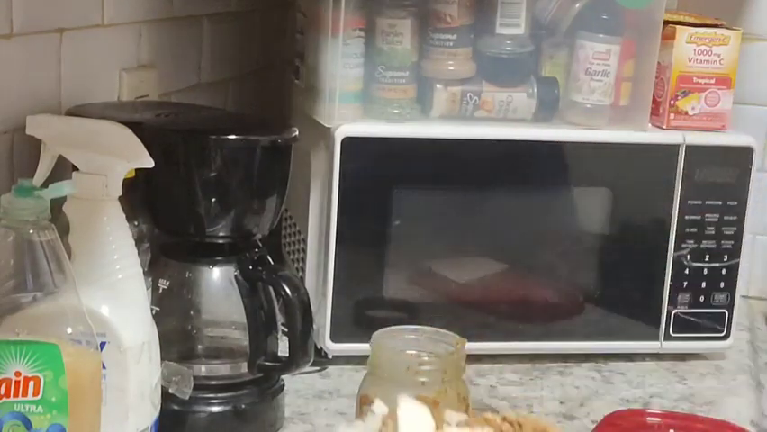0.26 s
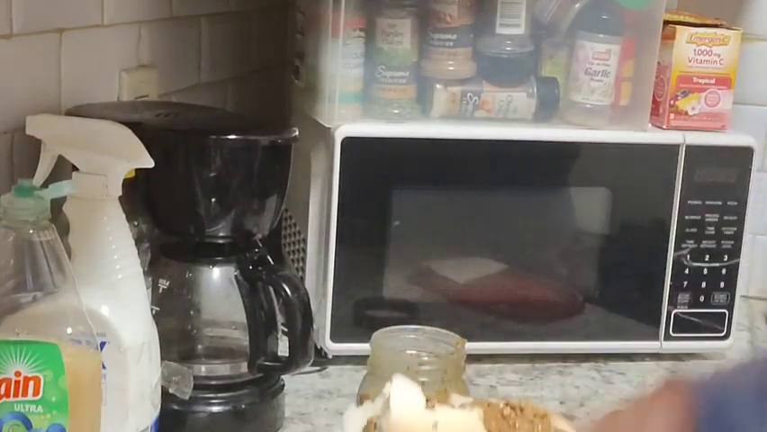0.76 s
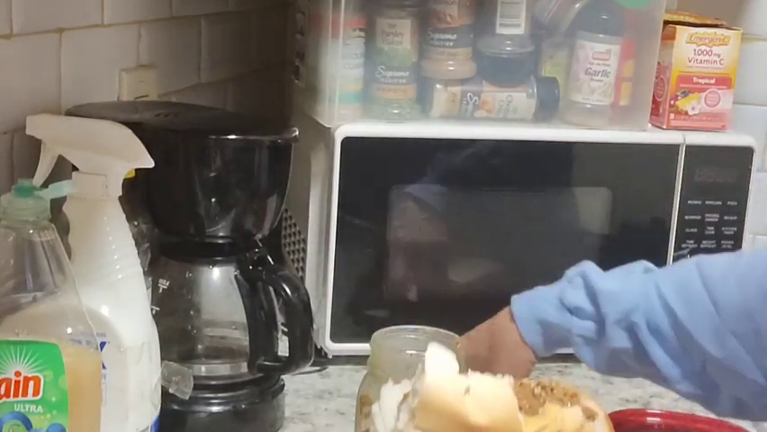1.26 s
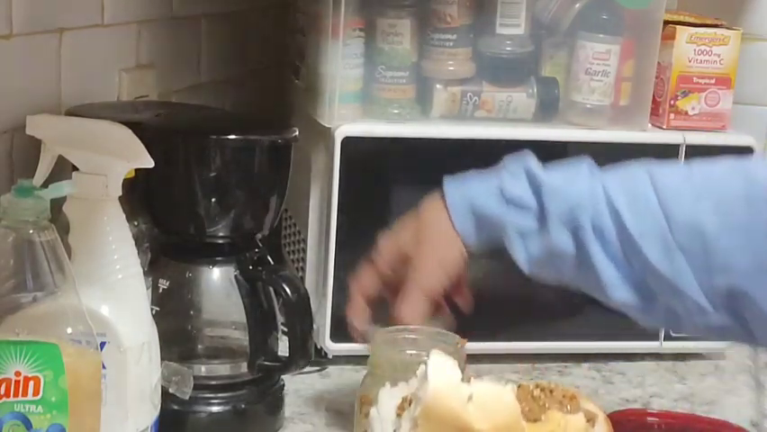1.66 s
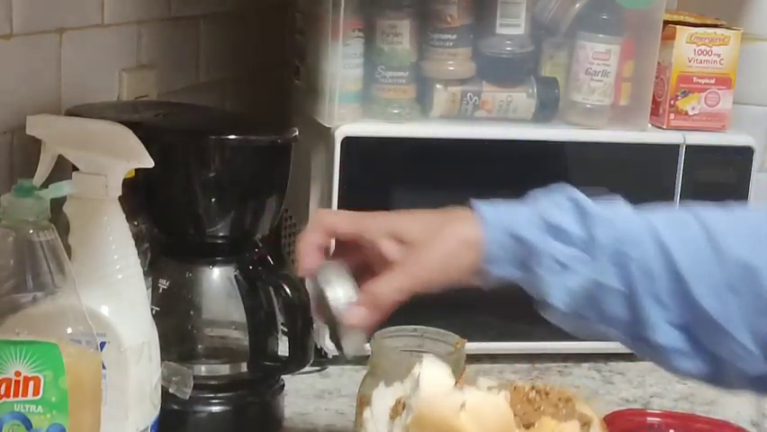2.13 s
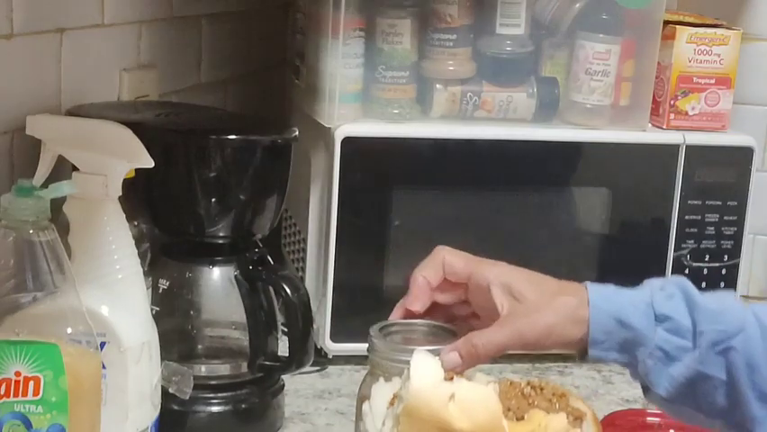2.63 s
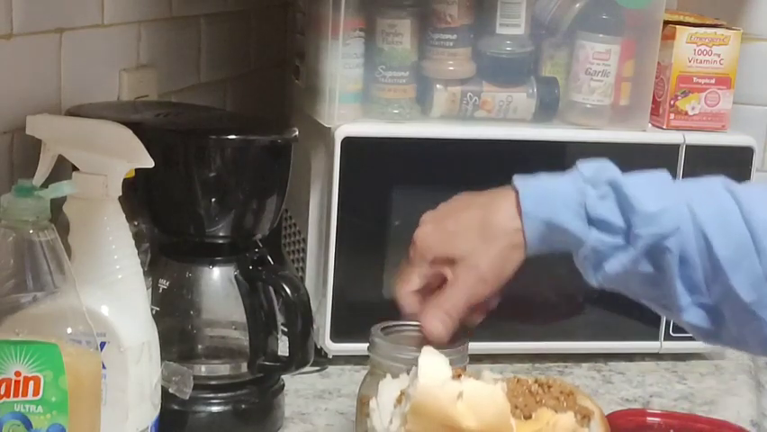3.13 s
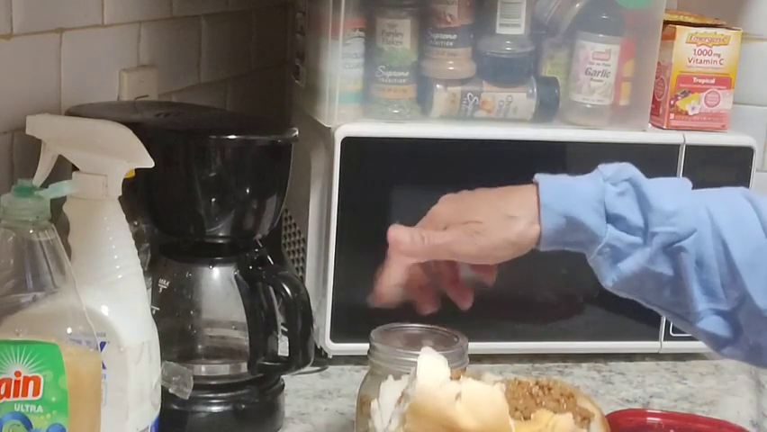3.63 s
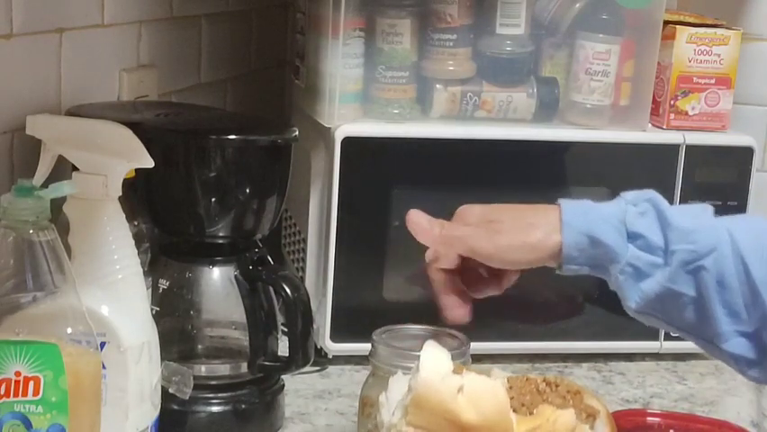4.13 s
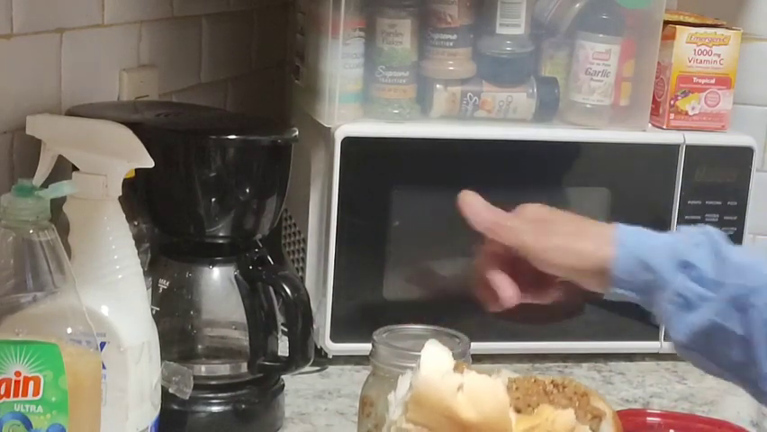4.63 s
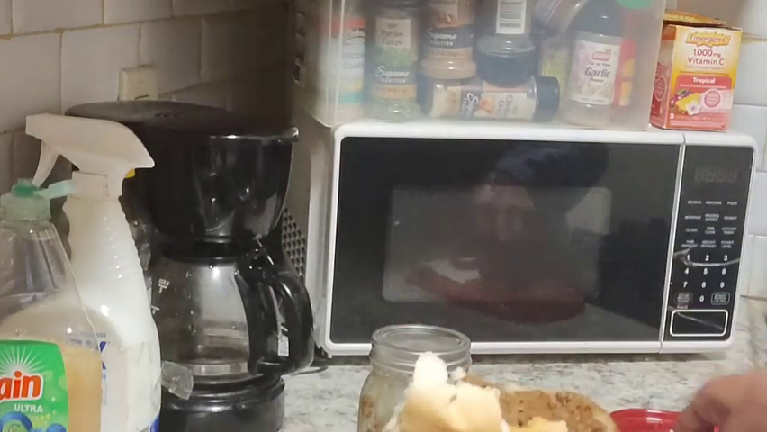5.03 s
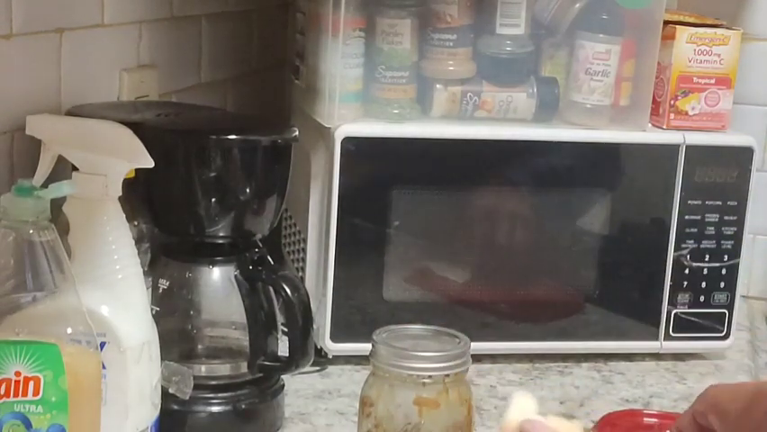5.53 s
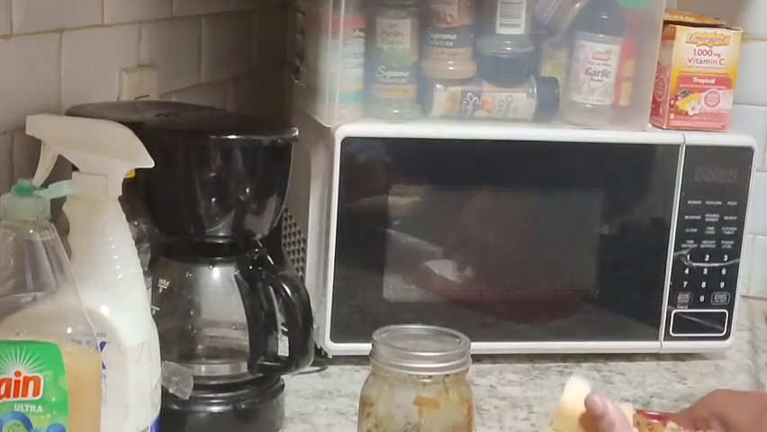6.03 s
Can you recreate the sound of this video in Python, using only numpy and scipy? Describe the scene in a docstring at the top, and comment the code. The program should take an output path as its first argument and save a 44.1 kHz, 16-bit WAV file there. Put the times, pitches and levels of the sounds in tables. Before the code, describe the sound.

A metal utensil clatters sharply on a stone counter, then a metal lid clinks onto a glass jar and is tapped with dull thuds.

```python
"""A metal spoon or lid clatters and bounces on a stone counter in a quiet kitchen: dying sines over noise.
A metal lid, made the same way, is set on a glass jar, pressed home and tapped with a finger.
The jar's air and the counter answer with low knocks; fingers, a sleeve and a plate rub as grainy noise.
Small dry ticks come about three a second, strongest on the left, over room noise and a refrigerator's hum.
Left and right hear the nearby sounds in different colours."""
import sys
import numpy as np
from scipy import signal
from scipy.fft import rfft, irfft
from scipy.io import wavfile
from scipy.ndimage import uniform_filter1d

SR = 44100
rng = np.random.default_rng(int(sys.argv[2]) if len(sys.argv) > 2 else 0)


def file_out(sig):
    """Save sig as 16-bit WAV at sys.argv[1]."""
    # one column per channel
    cols = np.atleast_2d(sig).T
    # limit, then scale
    lim = np.clip(cols, -1, 1)
    pcm = np.round(lim * 32767).astype(np.int16)
    wavfile.write(sys.argv[1], SR, pcm)


N = 277116


def gain_of(db):
    """Turns decibels into a factor to multiply by."""
    return 10 ** (np.asarray(db) / 20)


def read(points, hz):
    """Reads a table of (pitch, value) in straight lines along a logarithmic pitch axis."""
    pitch_hz, value = np.transpose(points)
    return np.interp(np.log(hz + 1), np.log(pitch_hz + 1), value)


def add(mix, start_s, sound):
    """Mixes in a two-channel sound from start_s on, cut off at the end of the mix."""
    part = mix[:, round(start_s * SR):][:, :sound.shape[1]]
    part += sound[:, :part.shape[1]]


def sides(left_right_db):
    """Left and right gains that differ by the given decibels; above zero favours the left."""
    return gain_of(np.array([left_right_db / 2, -left_right_db / 2]))


def onset(t, rise_ms):
    """A smooth rise from 0 to 1, never faster than 0.3 ms."""
    return np.sin(np.pi / 2 * np.clip(1000 * t / max(rise_ms, .3), 0, 1)) ** 2


# How unlike left and right hear nearby sounds: (pitch_hz, left_right_db)
NEAR_SIDES = [(60, -4.5), (110, 4), (200, 2), (380, -8), (700, 1), (1290, 7), (2380, 5), (4400, 13),
              (8120, -6.5), (15000, -5.5)]


def noise(size, spectrum, tilt_db=0., same=0.072, side=NEAR_SIDES, lumpy_db=0.):
    """Two partly alike channels of coloured noise, rms 1; random lumps stand for clusters of resonances."""
    hz = np.fft.rfftfreq(size, 1 / SR)
    left, other = rfft(rng.standard_normal((2, size)))
    unlike = np.sqrt(1 - np.minimum(abs(same), 1) ** 2)
    right = same * left + unlike * other
    lump_heights = np.minimum(rng.exponential(1, 400), 2.8)
    lumps = np.interp(hz, np.arange(400) * 110, lump_heights)  # one every 110 Hz
    tilt = tilt_db * np.log2((hz + 50) / 5000)  # dB an octave
    colour = gain_of(read(spectrum, hz) + tilt + lumpy_db * lumps) * sides(read(side, hz))
    x = irfft(np.array([left, right]) * colour, size)
    return x / np.sqrt(np.mean(x ** 2))


def ring(modes, t, place=.5, damping=1., waver=.6, lead=0.88):
    """Dying sines weighted by the place struck; reflections and rebounds make each waver on each side."""
    hz, one_end_db, other_end_db, fade_s = np.transpose(modes)
    level = gain_of(one_end_db + np.clip(place, 0, 1) * (other_end_db - one_end_db))
    level = level / np.linalg.norm(level) * sides(read(NEAR_SIDES, hz))
    # random values 7 ms apart, joined by straight lines
    knots = rng.standard_normal((2, 2, len(hz), 64))
    step = t / .007
    whole, part = step.astype(int) % 63, step % 1
    drift = knots[..., whole] * (1 - part) + knots[..., whole + 1] * part
    phase = 2 * np.pi * (hz[:, None] * t + rng.random((len(hz), 1)))
    phase = phase + np.array([lead, 0])[:, None, None]  # left leads, in radians
    wave = (1 + waver * drift[0]) * np.sin(phase) + waver * drift[1] * np.cos(phase)
    decay = gain_of(-60 * damping * t / np.clip(fade_s, .02, .6)[:, None])
    return np.einsum("cm,cmt->ct", level, decay * wave) / np.hypot(1, waver)


TAP_RISE_MS, SLIDE_RISE_MS, GLASS_RISE_MS = 2.8, 27.5, 17.5
RING_PER_DB = 0.4661  # harder blows ring more clearly: dB of ring over clatter for each dB of strength
LUMPY_DB = 5  # how uneven the clatter is from one cluster of resonances to the next
ECHO_DB, ECHO_FADE_S = -41.5, 1  # kitchen echo: dB against the blow before its soft rise, s to fall 60 dB


def blows(rows, rise_ms, modes, clatter, ring_db, crack_db, fade_s, chatter_db, waver):
    """A crack, clear sines and dense clatter roughened by tiny rebounds; it holds, then dies away quickly."""
    out, t, echo_t = np.zeros((2, N)), np.arange(14000) / SR, np.arange(27000) / SR
    for time_s, level_db, left_right_db, tail_s, tilt_db, place in rows:
        tail_s = max(tail_s, .02)
        clear_db = ring_db + RING_PER_DB * level_db

        rebounds = np.minimum(rng.exponential(1, 200), 3.5) - 1
        chatter = np.interp(t, np.arange(200) * 0.0017, rebounds)
        tail = gain_of(-60 * t / tail_s)
        crack = gain_of(crack_db - 60 * t / 0.011)
        dense = noise(len(t), clatter, tilt_db, lumpy_db=LUMPY_DB)
        dense = dense * gain_of(chatter_db * chatter) * (tail + crack)

        clear = gain_of(clear_db) * ring(modes, t, place, 0.28 / tail_s, waver)
        envelope = onset(t, rise_ms) * np.exp(-(t / fade_s) ** 4)
        level = gain_of(level_db) / np.hypot(1, gain_of(clear_db)) * sides(left_right_db)[:, None]
        add(out, time_s - .001, level * (dense + clear) * envelope)

        # the echo off tiles and cupboards swells in and is eased out at its end
        echo = noise(len(echo_t), clatter, tilt_db) * gain_of(ECHO_DB - 60 * echo_t / ECHO_FADE_S)
        echo = echo * onset(echo_t, 40) * onset(echo_t[::-1], 100)
        add(out, time_s, gain_of(level_db) * echo)
    return out


# Colour of the room noise: (pitch_hz, relative_level_db per Hz)
ROOM_COLOUR = [(18, -53), (43, -15.5), (140, -5.5), (183, -10), (247, -5.5), (366, -8), (542, -9),
               (1100, -18), (1250, -20), (2400, -27.5), (3900, -29), (4500, -25.5), (5200, -29),
               (5950, -23), (6900, -34), (8500, -35), (9000, -28), (9600, -35), (15750, -38.5),
               (16000, -53.5)]
# How alike left and right are, limited to 0-1 in use: (pitch_hz, likeness)
ROOM_LIKENESS = [(60, 1), (180, 1.5), (550, 0.18), (1650, -2), (4970, -3), (15000, 2)]
# Balance of the room noise: (pitch_hz, left_right_db)
ROOM_SIDES = [(60, 1.5), (180, 5), (550, 2), (1650, 5), (4970, -1), (15000, -3.5)]
# How far left runs ahead in the shared part of the noise: (pitch_hz, lead_radians)
ROOM_LEADS = [(50, 0.043), (300, 0.3), (1000, 1.2), (3000, 3.5), (9000, 6.2)]
# Refrigerator hum bands, 30 dB down one width either side: (pitch_hz, width_hz, level_db)
HUM_BANDS = [(141.7, 6.8, -70), (294, 14, -72.5), (557, 40, -75.5), (836.8, 360, -74)]
ROOM_DB = -63.5


def room():
    """Steady coloured noise, gently swelling, with narrow noise bands for the refrigerator's wavering hum."""
    hz = np.fft.rfftfreq(N, 1 / SR)
    swell = uniform_filter1d(rng.standard_normal(N), 5000) * np.sqrt(5000)
    likeness = np.clip(read(ROOM_LIKENESS, hz), 0, 1) * np.exp(-1j * read(ROOM_LEADS, hz))
    air = noise(N, ROOM_COLOUR, same=likeness, side=ROOM_SIDES)
    tone = gain_of(ROOM_DB + 0.27 * swell) * air
    for pitch_hz, width_hz, level_db in HUM_BANDS:
        band = [(pitch_hz - width_hz, -30), (pitch_hz, 0), (pitch_hz + width_hz, -30)]
        spectrum = [(0.98, -69)] + band + [(2000, -95.5)]
        tone = tone + gain_of(level_db) * noise(N, spectrum, same=1.0, side=ROOM_SIDES)
    return tone


# When each tick comes and how strong it is: (time_s, level_db)
TICK_TIMES = [(.2258, -48), (.5436, -47.5), (1.1782, -42.5), (1.501, -44), (1.8188, -45.5), (2.141, -46.5),
              (2.8695, -46), (2.9407, -45.5), (3.0985, -45), (3.4188, -43.5), (3.7426, -43.5),
              (4.0563, -52), (4.386, -43), (4.7073, -45), (5.024, -47.5), (5.3433, -47), (5.6675, -44.5),
              (5.9941, -46.5)]
# The short sines inside one tick: (pitch_hz, level_db, fade_s to fall 60 dB, delay_ms)
TICK_SINES = [(15800, -1, 0.0012, .4), (14200, 1.5, 0.0013, 0.416), (12320, 0, 0.0012, .35),
              (10960, -7.5, 0.0015, 0.267), (9820, -7.5, 0.0021, .3), (7900, -6, 0.0022, 0.11),
              (6440, -10, 0.0052, 0), (4850, -12.5, 0.0052, 0.926), (3940, -5.5, 0.0095, 1.09)]
TICK_SIDE_DB = 19  # left over right


def ticks():
    """Each dry tick sums short sines with tiny delays of their own; a faint low-pitched one comes just before."""
    out, t = np.zeros((2, N)), np.arange(2048) / SR
    parts = []
    for pitch_hz, level_db, fade_s, delay_ms in TICK_SINES:
        since_s = np.maximum(t - delay_ms / 1000, 0)
        sine = np.sin(2 * np.pi * pitch_hz * since_s)
        parts.append(gain_of(level_db - 60 * since_s / fade_s) * sine * onset(since_s, .25))
    for time_s, level_db in TICK_TIMES:
        level = gain_of(level_db) * sides(TICK_SIDE_DB)[:, None]
        add(out, time_s - .0008, level * sum(parts))
        add(out, time_s - .0185, gain_of(-15) * level * parts[-1])
    return out


# Blows of the spoon or lid on stone, begun 1 ms before time_s:
# (time_s, level_db, left_right_db, tail_s to fall 60 dB, tilt_db per octave, place struck 0-1)
CUTLERY_BLOWS = [(.4117, -38.5, -1.5, 0.32, -1.5, 0.2), (.4274, -45, -11, 0.23, 6, .9),
                 (.4444, -48, -1, 0.39, -1, 0.8), (.6835, -11.5, 5, 0.31, 1.13, 0),
                 (.816, -12, -3, .26, 1, 0.93), (.8353, -13.5, -1.5, 0.17, -2, 1),
                 (.9045, -12.5, -3.5, 0.19, -1.16, 0.99), (.946, -17.5, -2.5, 0.19, -1.6, 0.8),
                 (.9935, -28.5, 0.5, 0.16, -4, 1)]
# Its slide along the stone: same columns
CUTLERY_SLIDE = [(.592, -51.5, -3, .48, -.35, .3)]
# Clear tones of the metal; each blow's tail also scales the fade:
# (pitch_hz, level_db struck at one end, level_db struck at the other, fade_s)
STEEL_TONES = [(1330, -25, -20, .4), (1895, -18, -8, .13), (2750, -10, -14, .12), (3198, -13, -18, .23),
               (3442, -2, -8, .2), (3485, -9, -14, .2), (5137, -4, -6, .15), (5503, -14, -14, .3),
               (5780, -5, -16, .17), (5826, 0, -14, .18), (5889, -5, -16, .17), (6288, -6, -14, .25),
               (6890, -20, -12, .12), (7052, -4, -16, .27), (8326, -20, 0, .22), (9088, -18, -5, .2),
               (9823, -5, -6, .3), (10910, -22, -18, .22), (11785, -25, -6, .2), (12520, -13, -16, .25),
               (13485, -18, -16, .24), (13920, -20, -12, .25)]
# Colour of its dense clatter: (pitch_hz, relative_level_db per Hz)
STEEL_COLOUR = [(240, -32.5), (430, -14), (650, -6.5), (900, -14), (1500, -18), (1880, -2), (2370, -9),
                (3370, -5.5), (6710, -7.5), (8580, -4.5), (11100, -10.5), (12000, -4), (15600, -7.5),
                (16100, -35)]


def cutlery():
    """Metal bouncing and sliding on stone: quick-rising blows and a slower-rising slide."""
    steel = dict(modes=STEEL_TONES, clatter=STEEL_COLOUR, ring_db=9.5, crack_db=2,
                 fade_s=0.23, chatter_db=2.0, waver=0.93)
    return blows(CUTLERY_BLOWS, TAP_RISE_MS, **steel) + blows(CUTLERY_SLIDE, SLIDE_RISE_MS, **steel)


# Low knocks, begun 4 ms before time_s: (time_s, jar_air_level_db, left_right_db, boom_over_jar_db)
LOW_KNOCKS = [(.414, -39.5, 2.5, 0), (.437, -53.5, 17, 4.5), (.688, -38.5, 6, 8), (.814, -38, -6.5, 10),
              (.908, -36.5, -15, 0), (.957, -41, -5, 4), (2.297, -49, -25.5, 1.5),
              (2.415, -47.5, -19, -1.5), (2.482, -34, -8, -4), (3.121, -48, -15.5, -9),
              (3.264, -59.5, -30, -1.5), (3.504, -35.5, -20.5, -3), (3.53, -42, -10, -9),
              (3.562, -41, -6, -7.5), (3.595, -39, -14, -10.5), (3.815, -38.5, -17, -4),
              (3.857, -27.5, -14, -6), (4.066, -35, -27, -6), (4.125, -11, -12.5, -13),
              (4.148, -26.5, -10, 0.2), (4.337, -42.5, -19, 1.8), (4.386, -26, -22, -3.5),
              (4.569, -46, -12, 4), (4.603, -37, -9, -1.5)]
# Low tones of the counter, fade limited to 0.6 s in use:
# (pitch_hz, level_db struck at one end, level_db struck at the other, fade_s)
COUNTER_TONES = [(120, -8, -9, 0.19), (149.4, 2, -4, 0.6), (209.2, -6.5, -3, 0.9), (242.9, 5, 0, 0.31),
                 (317.9, -3, -2, 0.6), (426, -4, -4, 0.13)]
# Colour of the counter's boom: (pitch_hz, relative_level_db per Hz)
BOOM_COLOUR = [(29, -51), (50, -21), (92, -20.5), (135, -7.5), (233, -8), (270, -2.5), (383, -7),
               (523, -18.5), (628, -19), (1100, -25.5), (1600, -32.5), (4000, -56), (5200, -83),
               (8800, -120)]
JAR_AIR_HZ = 385.8  # where the swing settles
KNOCK_RISE_MS, KNOCK_RISE_MS_PER_DB = 19, 0.26  # a firm press builds up longer than a light one
KNOCK_FADE_S = 0.044  # main burst down 60 dB


def knocks():
    """A soft blow swings the air in the jar for a few cycles; the counter's boom lasts longer."""
    out, t = np.zeros((2, N)), np.arange(9000) / SR
    for time_s, level_db, left_right_db, boom_db in LOW_KNOCKS:
        sag = 1 + 0.074 * np.exp(-t / 0.0068)  # the pitch sags as the lid relaxes
        swing = np.sin(2 * np.pi * JAR_AIR_HZ * np.cumsum(sag) / SR)
        burst = gain_of(-60 * (t / KNOCK_FADE_S) ** 2) + gain_of(-23 - 60 * t / 0.33)
        rise = onset(t, KNOCK_RISE_MS + KNOCK_RISE_MS_PER_DB * level_db)
        air = swing * burst * rise * sides(left_right_db)[:, None]

        rumble = noise(len(t), BOOM_COLOUR, same=0.41, lumpy_db=4.5) * gain_of(-60 * t / 0.28)
        boom = ring(COUNTER_TONES, t, waver=0.35, lead=0.56) + gain_of(-1.0) * rumble
        boom = gain_of(boom_db) * boom * onset(t, 12) * np.exp(-(t / 0.13) ** 6)
        boom = boom * sides(0.47 * left_right_db)[:, None]
        add(out, time_s - .004, gain_of(level_db) * (air + boom))
    return out


# Blows of the jar's lid, begun 1 ms before time_s:
# (time_s, level_db, left_right_db, tail_s to fall 60 dB, tilt_db per octave, place struck 0-1)
LID_BLOWS = [(1.4656, -55, 2, .3, -2.5, .5), (2.2827, -38, 4, 0.22, 1, 0.35),
             (2.294, -46.5, -1, 0.22, -1, .2), (2.404, -43.5, 0, 0.33, -1, 0.84),
             (2.4113, -37, 3.5, 0.41, 0.5, 1), (2.4747, -39, 8, 0.2, -5, 0.47),
             (2.508, -45.5, .1, 0.42, -6, 0.35), (3.178, -47.5, .4, .26, -4, 0.85),
             (3.4996, -31, -3, 0.79, 4, 0.42), (3.81, -57, -2.5, 0.75, -3, .18),
             (4.0548, -42.5, -0.5, .4, -3.5, 0.0106), (4.1244, -44, -2, 0.35, -4, 0.094),
             (4.582, -60.5, -1, .2, -3, .05), (5.108, -59.5, 5, .12, -9, 0.21)]
# Slides of the lid: same columns
LID_SCRAPES = [(1.43, -54, 0, .35, -2.5, .5), (3.125, -50, -1, 0.73, 1.5, .3),
               (3.21, -44, -1, .24, -1, .22), (3.528, -43, 1.5, 0.59, -5.5, 0.25),
               (3.825, -41, -3, 0.26, 0.5, 0.18), (4.077, -37.5, 5, 0.28, 8, 0.17)]
# Clear tones of the lid; each blow's tail also scales the fade:
# (pitch_hz, level_db struck at one end, level_db struck at the other, fade_s)
TIN_TONES = [(2486, 0.5, -27.5, 0.56), (2650, 1, -17, 0.61), (2800, -28, -9, 0.15), (4580, -19, 16, 0.096),
             (5330, -20, 10, 0.17), (6050, -7, -1, 0.083), (6040, -26, -10, 0.13), (8100, 8, -16, 0.2),
             (9700, 4.5, 0, 0.18)]
# Colour of its dense clatter: (pitch_hz, relative_level_db per Hz)
TIN_COLOUR = [(300, -30.5), (500, 1), (1200, -13.5), (2000, -6.5), (2600, 4), (3200, -5.5), (4300, -3),
              (5900, 4.5), (6950, -5.5), (8000, -1.5), (10000, 0), (12100, -8.5), (15600, -6.5),
              (16100, -29)]


def lid():
    """The metal lid tapped and slid: a strong crack, then strongly wavering tones that die away quickly."""
    tin = dict(modes=TIN_TONES, clatter=TIN_COLOUR, ring_db=12, crack_db=5.5,
               fade_s=0.12, chatter_db=0.5, waver=1.65)
    return blows(LID_BLOWS, TAP_RISE_MS, **tin) + blows(LID_SCRAPES, SLIDE_RISE_MS, **tin)


# Blows on the glass jar, begun 1 ms before time_s:
# (time_s, level_db, left_right_db, tail_s to fall 60 dB, tilt_db per octave, place struck 0-1)
GLASS_BLOWS = [(2.391, -36, 1, 0.15, .3, .1), (2.413, -37.5, -6.5, 0.97, .3, 1),
               (2.475, -17.5, -2, 0.36, .3, 0.027)]
# Clear tones of the jar; each blow's tail also scales the fade:
# (pitch_hz, level_db struck at one end, level_db struck at the other, fade_s)
JAR_TONES = [(436, -9, -9, .2), (899, 0, 0, .2), (1265, -24, -20, .25), (1315, -25, -22, .2),
             (1803, -17, -24, .12), (2094, -26, -25, .2), (2525, -28, -27, .25), (3074, -28, -12, .3),
             (3531, -25, -24, .35), (4963, -22, -18, .13), (5577, -21, -21, .15), (6315, -23, -22, .13)]
# Colour of its dense clatter: (pitch_hz, relative_level_db per Hz)
GLASS_COLOUR = [(300, -43), (500, 2.5), (1000, -16), (1800, -12), (3300, -34), (5600, -7.5), (7000, -21.5),
                (16000, -44)]


def glass():
    """The glass jar rings under the lid: soft-rising blows with clear tones and little crack."""
    return blows(GLASS_BLOWS, GLASS_RISE_MS, JAR_TONES, GLASS_COLOUR, ring_db=28, crack_db=-15,
                 fade_s=0.11, chatter_db=3.0, waver=0.43)


# Fingers, sleeve and plate rubbing; swell and fade span 30 dB and last at least 0.02 s in use:
# (fastest_moment_s, level_db, swell_s, fade_s)
RUB_STROKES = [(3.06, -70.5, .2, 2.5), (3.2, -62, 0.44, -0.36), (5.47, -53, 0.2, 0.2),
               (5.88, -74, 0.7, 0.3), (6.16, -67, 0.2, 0.5), (6.245, -60.5, 0.18, 0.3)]
# Colour of the rubbing: (pitch_hz, relative_level_db per Hz)
RUB_COLOUR = [(400, -4), (900, -0.5), (2000, 5), (4800, 2), (6500, -5), (15700, -24.5), (16000, -40)]


def rubs():
    """Grainy friction noise that swells to the fastest moment of each stroke and dies away."""
    out = np.zeros((2, N))
    for fastest_s, level_db, swell_s, fade_s in RUB_STROKES:
        swell_s, fade_s = max(swell_s, .02), max(fade_s, .02)
        t = np.arange(-swell_s, fade_s, 1 / SR)
        stroke_db = -30 * np.maximum(-t / swell_s, t / fade_s)
        grain = uniform_filter1d(rng.standard_normal(len(t)), 90) * np.sqrt(90)
        level = gain_of(level_db + stroke_db + 1.12 * grain)
        add(out, fastest_s - swell_s, noise(len(t), RUB_COLOUR, same=0.24) * level)
    return out


def scene():
    """Adds up all the sources, left and right."""
    return room() + ticks() + cutlery() + knocks() + lid() + glass() + rubs()


BASS_EDGE_HZ, TREBLE_EDGE_HZ = 45, 16300


def record(dry):
    """The microphone's bass roll-off, then a steep cut of the highest treble."""
    bass_cut = signal.butter(2, BASS_EDGE_HZ, "high", fs=SR, output="sos")
    thin = signal.sosfilt(bass_cut, dry)
    treble_cut = signal.firwin(255, TREBLE_EDGE_HZ, window=("kaiser", 12), fs=SR)
    return signal.oaconvolve(thin, treble_cut[None], "same")


dry = scene()
out = record(dry)
file_out(out)
```